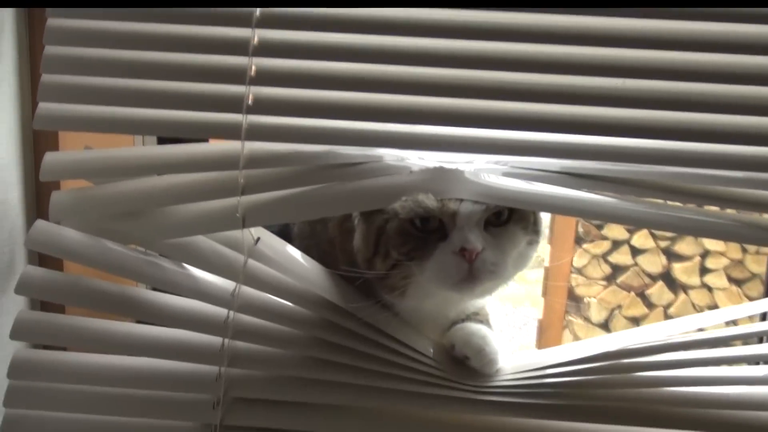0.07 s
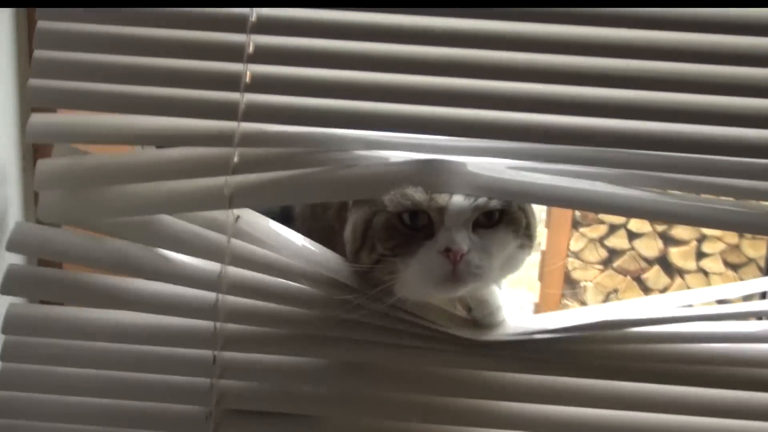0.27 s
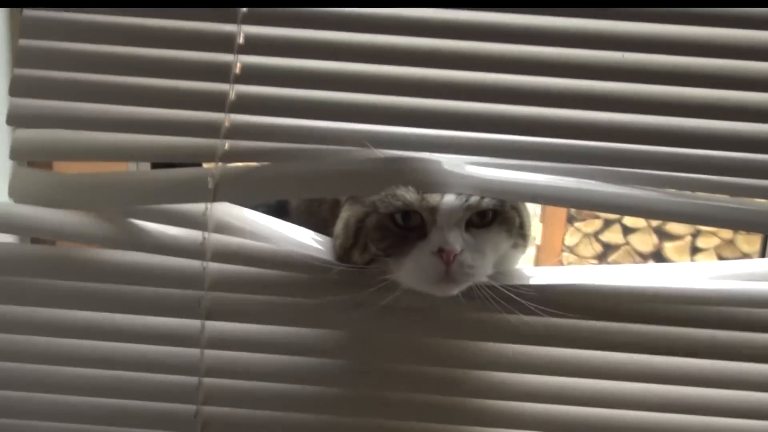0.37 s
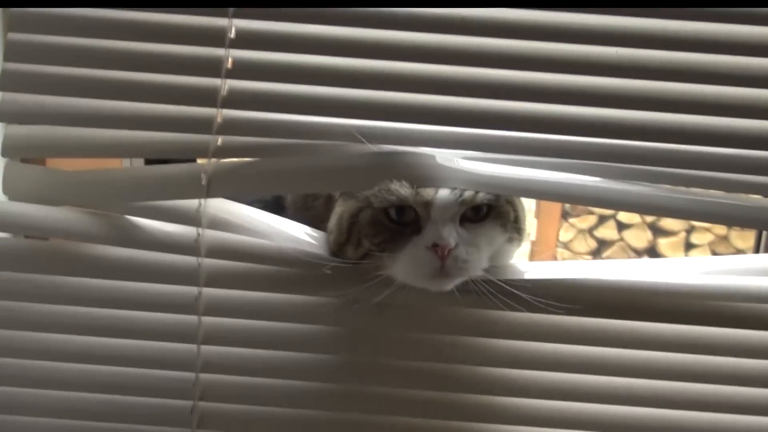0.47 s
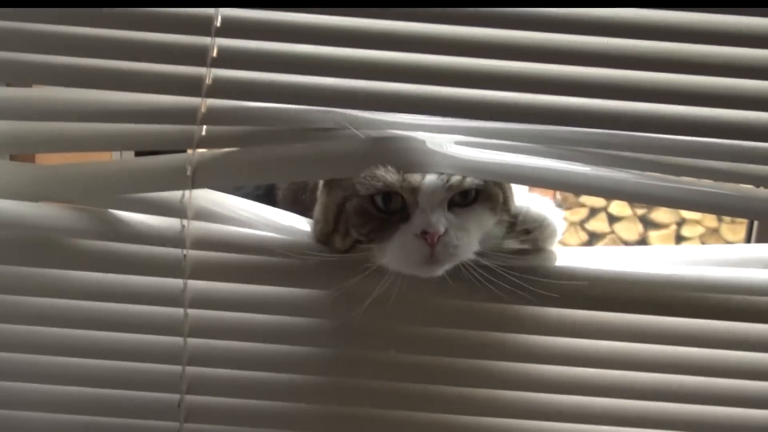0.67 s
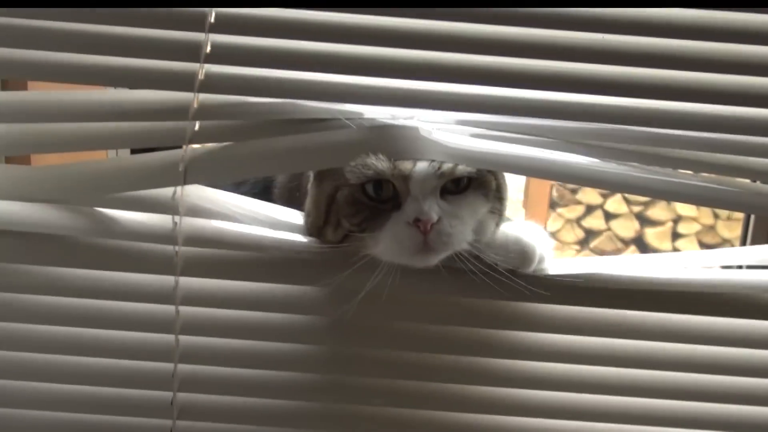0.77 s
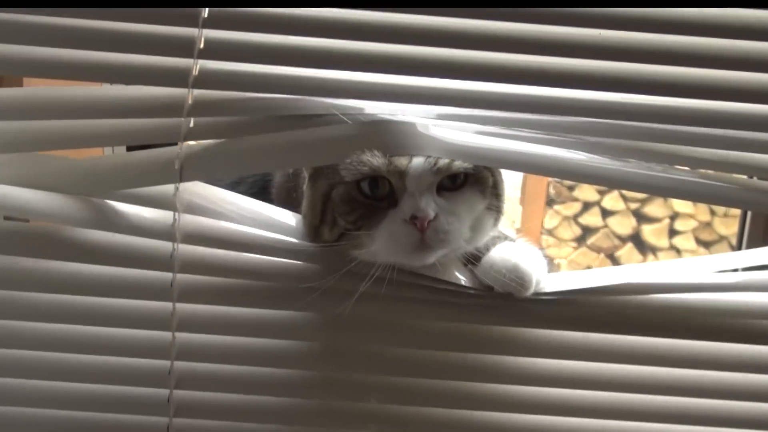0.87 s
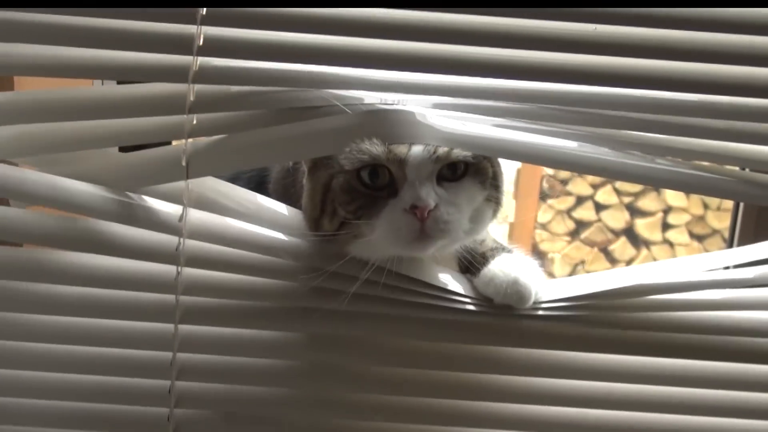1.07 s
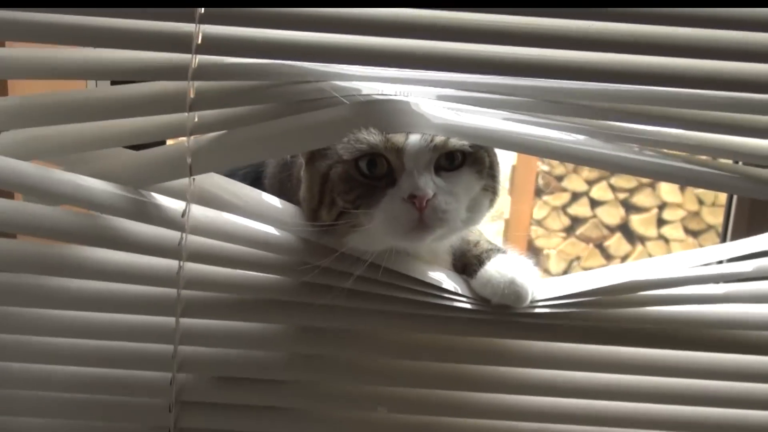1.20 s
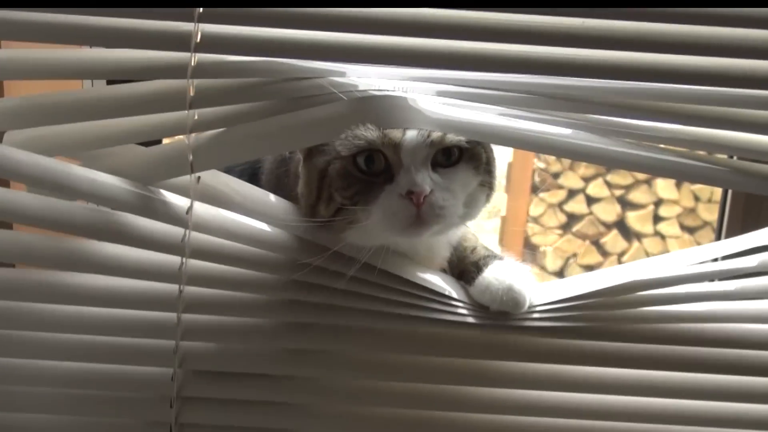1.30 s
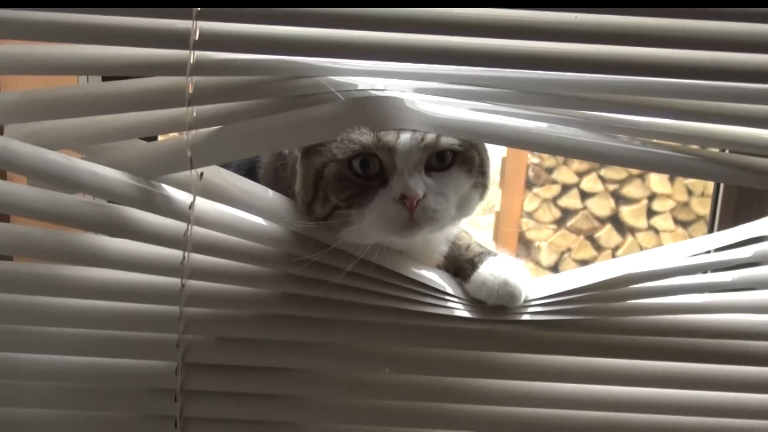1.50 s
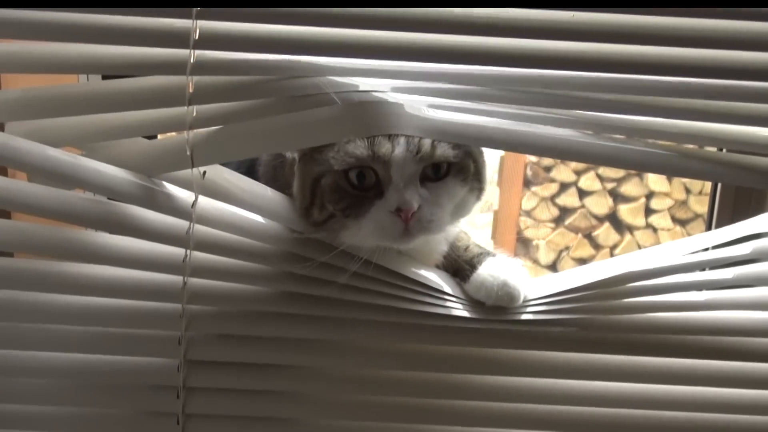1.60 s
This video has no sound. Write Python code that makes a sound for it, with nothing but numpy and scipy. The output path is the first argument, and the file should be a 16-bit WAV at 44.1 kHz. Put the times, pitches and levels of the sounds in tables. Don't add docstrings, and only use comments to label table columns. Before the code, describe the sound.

Thin window blind slats snap and clatter as a cat pushes through. After near quiet, a bright snap comes at 0.24 s, then a dense loud rattle at 0.33-0.42 s, ringing hollow and metallic. Another sharp snap lands at 0.71 s, a duller one at 0.85, softer clacks at 1.02 and 1.32, and tiny ticks around 1.6. Low fur rustle and quiet room noise lie beneath, in a small hard room.

```python
import sys
import numpy as np
from scipy import signal
from scipy.fft import irfft
from scipy.io import wavfile
from scipy.ndimage import uniform_filter1d

SR = 44100
rng = np.random.default_rng(int(sys.argv[2]) if len(sys.argv) > 2 else 0)


def inscribe(sig):
    pcm = np.round(np.clip(np.atleast_2d(sig).T, -1, 1) * 32767)
    wavfile.write(sys.argv[1], SR, pcm.astype(np.int16))


def boost_factor(decibels):
    exponent = np.asarray(decibels, float) / 20
    return 10 ** exponent


N = 72765
EVENT_N = 26000

# frequency in Hz, level in dB per Hz.
SLAT_SPECTRUM = [(300, -38.5), (700, -21), (1300, -14.5), (2500, -12.5), (3800, -12.5), (6800, -8),
                 (11500, -17), (16000, -48)]


def evened(x):
    return x / np.sqrt(np.mean(x ** 2) + 1e-20)


def read(points, hz):
    f, value = np.transpose(points)
    return np.interp(np.log(hz + 1), np.log(f + 1), value)


def over_time(points):
    return boost_factor(np.interp(np.arange(N) / SR, *np.transpose(points)))


def ports(hz):
    # frequency in Hz, level difference in dB.
    left_over_right = [(60, 0), (200, -0.5), (700, 3), (1300, 3), (2400, 2.5), (4400, 1), (8100, -1),
                       (11800, -3.5)]
    # frequency in Hz, lead in radians.
    left_lead = [(100, 0), (1500, 0), (3200, .5), (5000, .3), (8500, 1.9), (10800, 1.6), (11800, 0)]
    half = boost_factor(read(left_over_right, hz) / 2) * np.exp(.5j * read(left_lead, hz))
    return np.array([half, 1 / half])


def diffuse(shape, size):
    # frequency in Hz, correlation from 0 to 1.
    likeness = [(60, .75), (130, .995), (300, .99), (640, .88), (1400, .55), (3100, .3), (10500, .4),
                (11800, .96)]
    hz = np.fft.rfftfreq(size, 1 / SR)
    a, b, c, d = rng.standard_normal(shape.T.shape + (4,)).T
    same = np.clip(read(likeness, hz), 0, 1)[:, None]
    left = a + 1j * b
    right = same * left + np.sqrt(1 - same ** 2) * (c + 1j * d)
    z = np.array([left, right]) * ports(hz)[:, :, None]
    return signal.istft(z * shape, nperseg=size, noverlap=size * 3 // 4)[1]


def colour(db):
    log = np.log(boost_factor(np.concatenate([db, db[-2:0:-1]])))
    return np.fft.ifft(np.exp(log - 1j * signal.hilbert(log).imag)).real


def air():
    # frequency in Hz, level in dB per Hz.
    air_spectrum = [(30, -25), (60, -9), (150, -20.5), (220, -31.5), (900, 2.5), (4000, -13),
                    (12500, -26.5), (16000, -40)]
    # time in seconds, level in dB.
    sway = [(0, -63.5), (.12, -66.5), (.22, -60), (.65, -57), (1.0, -54), (1.28, -54.5), (1.5, -65.5),
            (1.65, -59.5)]
    hz, frames = np.fft.rfftfreq(2048, 1 / SR), N // 512 + 5

    def steady(spectrum):
        shape = boost_factor(read(spectrum, hz))[:, None] * np.ones(frames)
        return evened(diffuse(shape, size=2048)[:, :N])

    noise = steady(air_spectrum)
    whisper = steady(SLAT_SPECTRUM)
    return noise * boost_factor(-55) + whisper * over_time(sway)


def fur():
    # frequency in Hz, level in dB per Hz.
    fur_spectrum = [(59, -48), (140, -26.5), (190, -5.5), (330, -3.5), (430, 1.5), (801, 7.5), (1000, 4.5),
                    (1300, -49), (2200, -120)]
    # time in seconds, level in dB.
    rub = [(0.0, -66), (0.104, -64.5), (0.256, -54), (0.514, -47), (0.588, -58), (0.748, -53),
           (0.808, -66.5), (0.868, -47), (1.08, -56.5), (1.098, -61.5), (1.296, -59.5), (1.354, -57.5),
           (1.438, -63), (1.65, -60.5)]
    top_hz, patch_db = 1100, 2
    hz, frames = np.fft.rfftfreq(1024, 1 / SR), N // 256 + 5
    patches = rng.standard_normal((frames, 513)).T
    patches = uniform_filter1d(patches, size=4, axis=0)
    patches = evened(uniform_filter1d(patches, size=5, axis=1))
    dulling = -24 * np.log2(1 + (hz / top_hz) ** 2)
    low_cut = 20 * np.log10(np.minimum(hz / 100, 1) ** 2 + 1e-4)
    db = read(fur_spectrum, hz) + dulling + low_cut
    rustle = diffuse(boost_factor(db[:, None] + patch_db * patches), size=1024)[:, :N]
    return evened(rustle) * over_time(rub)


def ring(level_db, rise, hz, t60):
    # pitch ratio, level in dB, share of the t60.
    close_modes = [(.975, -14, .5), (1, 0, 1), (1.03, -12, .4)]
    t, turn = np.arange(EVENT_N) / SR, rng.random(len(close_modes))
    offset = np.array([[0], [.32 * turn[0]]])
    tone = 0
    for (ratio, db, share), start in zip(close_modes, turn):
        decay = boost_factor(db - 60 * t / (share * t60))
        tone = tone + decay * np.sin(2 * np.pi * (ratio * hz * t + start + offset))
    swell = np.sin(np.pi / 2 * np.minimum(t / rise, 1)) ** 2
    swell = boost_factor(4.5 + 60 * rise / t60) * swell
    return boost_factor(level_db) * tone * swell * abs(ports(np.array([hz])))


def room(clatter, fill):
    # frequency in Hz, t60 in seconds.
    room_t60 = [(300, 0.92), (1500, 0.37), (5000, 0.4), (9000, 0.48), (15000, 0.18)]
    # frequency in Hz, share of the fill time.
    bloom = [(1000, 0.036), (4000, 0.2), (12000, 0.2)]
    hz = np.fft.rfftfreq(256, 1 / SR)
    t = np.arange(420) * 64 / SR
    rise = 1 - np.exp(-t / (fill * np.maximum(read(bloom, hz), .01))[:, None])
    tail = diffuse(boost_factor(-60 * t / read(room_t60, hz)[:, None]) * rise, size=256)
    heard = boost_factor(4.5) * tail / np.sqrt((tail ** 2).sum(1).mean())
    to_ports = np.roll(irfft(ports(hz)), 8, axis=1)
    direct = signal.fftconvolve(clatter[None], to_ports, axes=1)
    heard[:, :direct.shape[1]] += direct
    return heard


def snap(level_db, length, tilt_db, sizzle_db):
    # frequency in Hz, width in Hz, level in dB.
    slat_modes = [(2450, 35, -10), (2730, 35, -9), (4065, 30, -4), (4570, 30, -8), (4790, 35, 0),
                  (4980, 30, -3), (5170, 25, -3), (5640, 30, -2), (5850, 35, -4), (6060, 50, -3),
                  (6290, 30, -2), (6460, 30, -4), (7800, 35, -6), (8210, 35, -8)]
    clicks_per_s, spread_db, first_db, shiver_t60 = 1900, 3, 15, 0.014
    t = np.arange(6000) / SR
    chance, size = rng.random((6000, 2)).T
    clicks = (chance < clicks_per_s / SR) * boost_factor(-spread_db * np.log(size + 0.011))
    clicks = clicks * np.clip(2 - 0.98 * t / length, 0, 1)
    clicks[0] = boost_factor(first_db + spread_db)
    power = np.convolve(clicks ** 2, boost_factor(-120 * t[:1000] / shiver_t60))[:6000]
    clicks = np.sqrt(power) * rng.standard_normal(6000)
    low = signal.sosfilt(signal.butter(2, 3150, fs=SR, output="sos"), clicks)
    lag = 0.2 * length * max(-tilt_db, 0) + 1e-4
    clicks = low + (clicks - low) * np.minimum(t / lag + .1, 1)

    hz = np.fft.rfftfreq(2048, 1 / SR)
    tilt = tilt_db * np.log2(np.clip(hz, 800, 9000) / 4000)
    sizzle = sizzle_db / (1 + (7900 / (hz + 1)) ** 6)
    body = colour(read(SLAT_SPECTRUM, hz) + tilt + sizzle)
    bend = rng.uniform(.997, 1.003, len(slat_modes))
    modes = 0
    for (f, width, db), k in zip(slat_modes, bend):
        modes = modes + boost_factor(db) * np.exp(-np.pi * width * t) * np.sin(2 * np.pi * f * k * t)
    slat = boost_factor(-8 - .5 * abs(tilt_db)) * modes / np.linalg.norm(modes)
    slat[:len(body)] += body / np.linalg.norm(body)
    heard = room(clicks / np.linalg.norm(clicks), length + lag)
    return boost_factor(level_db + 27.5) * signal.fftconvolve(heard, slat[None], axes=1)[:, :EVENT_N]


def slats():
    # start in seconds, level in dB, clatter length in seconds,
    # tilt in dB per octave, sizzle in dB.
    snaps = [(0.2368, -26.5, 0.018, 0, 5), (.335, -27, 0.026, 1.5, 0.5), (.3675, -29, 0.013, 0.5, 2),
             (.387, -27, 0.028, 0.5, -0.5), (.711, -27, 0.018, 0, 6), (0.8459, -31, 0.013, -1.5, -11.5),
             (.922, -51.5, 0.0057, -11, 19), (1.022, -35, 0.029, -3, -1), (1.319, -34.5, 0.031, -2.5, 5.5),
             (1.5765, -66, 0.0033, 13, 0), (1.5913, -54, 0.0036, 5.5, -1), (1.627, -57.5, 0.0057, 19, -8)]
    # start in seconds, level in dB, rise in seconds,
    # pitch in Hz, t60 in seconds.
    rail_rings = [(.238, -32.5, 0.0036, 1155, 0.15), (.262, -39, 0.023, 1094, 0.25),
                  (.39, -32.5, 0.0078, 1116, 0.12), (.405, -30.5, 0.02, 1103, 0.14),
                  (.485, -47.5, 0.023, 1109, 0.31), (.732, -37, 0.0095, 1152, 0.17),
                  (.765, -42.5, .02, 1116, 0.32), (.85, -40, 0.012, 1096, 0.31),
                  (.92, -43, 0.006, 1100, 0.092), (1.024, -33.5, 0.0017, 1100, 0.18),
                  (1.085, -43.5, 0.027, 1120, 0.15), (1.158, -49.5, 0.011, 1100, 0.16),
                  (1.319, -36, 0.0017, 1097, 0.11), (1.405, -48, 0.012, 1110, 0.056),
                  (.34, -40, 0.0047, 1098, 0.38)]
    # start in seconds, level in dB, rise in
    # seconds, pitch in Hz, t60 in seconds.
    knocks = [(.3355, -38, .001, 1500, .03), (.3682, -21, .0002, 2800, .009),
              (.3735, -23, .0003, 3000, .01), (.372, -28, .001, 6200, .02), (.34, -45, .005, 1110, .3),
              (1.3185, -45, .001, 800, .03), (1.333, -39, .002, 1150, .06), (1.591, -52, .001, 7900, .03),
              (1.63, -54, .001, 8000, .03), (1.631, -56, .001, 5000, .02), (1.036, -40, .003, 4300, .12),
              (.7115, -33, .001, 1980, .03), (1.025, -38, .002, 1350, .05), (1.3195, -41, .001, 1330, .03),
              (.3685, -27, .0002, 1900, .009), (.368, -27, .0002, 6500, .005),
              (.3695, -31, .0003, 3300, .01), (.3725, -31, .0003, 2000, .01), (.712, -36, .001, 1180, .035),
              (.7185, -34, .001, 2250, .03), (.721, -40, .001, 1200, .04), (.728, -39, .001, 2050, .03),
              (.402, -29, .0005, 8000, .015), (.238, -36, .001, 1450, .05), (.388, -32, .0005, 8700, .015),
              (.508, -49, .008, 790, .08), (.241, -31, .002, 6100, .05), (.24, -34, .002, 8300, .05),
              (.238, -34, .001, 2000, .03), (.34, -31, .001, 7100, .015), (.848, -38, .002, 1280, .05)]
    # start in seconds, level in dB, rise in seconds, pitch in Hz, t60 in seconds.
    sings = [(.40, -43, .015, 2444, .3), (.385, -40, 0.013, 4065, .2), (.38, -40, .015, 5900, .22),
             (.385, -44, 0.013, 5645, 0.14), (.47, -50, 0.018, 2283, 0.16), (.52, -57, .02, 3500, .15),
             (0.43, -57, .02, 5800, 0.13), (.44, -46, 0.023, 2800, 0.27), (0.5, -40.5, .015, 9100, 0.19),
             (.24, -40, 0.0086, 4980, .25), (.243, -32.5, 0.0061, 6290, 0.13),
             (.86, -45, 0.0092, 3400, 0.2), (.575, -54, 0.024, 1105, .25), (1.05, -43.5, 0.01, 1135, 0.23),
             (.93, -52.5, .04, 400, 0.29), (.445, -42, 0.016, 1085, .14), (.72, -37, .01, 8210, 0.31),
             (.40, -43, .015, 9017, .1)]
    out = np.zeros((2, N + EVENT_N))
    for table, source in ((snaps, snap), (rail_rings + knocks + sings, ring)):
        for start, *row in table:
            at = round(start * SR) - 8
            out[:, at:at + EVENT_N] += source(*row)
    return signal.sosfilt(signal.butter(3, 250, "high", fs=SR, output="sos"), out[:, :N])


def scene():
    return slats() + fur() + air()


def roll_off(x):
    return signal.sosfilt(signal.butter(12, 16300, fs=SR, output="sos"), x)


def record(dry):
    soft = signal.sosfilt(signal.butter(8, 15200, fs=SR, output="sos"), dry)
    return roll_off(soft)


dry = scene()
out = record(dry)
inscribe(out)
```